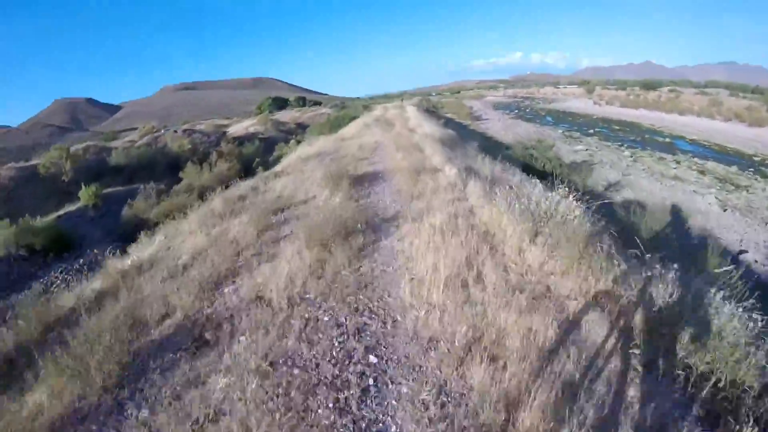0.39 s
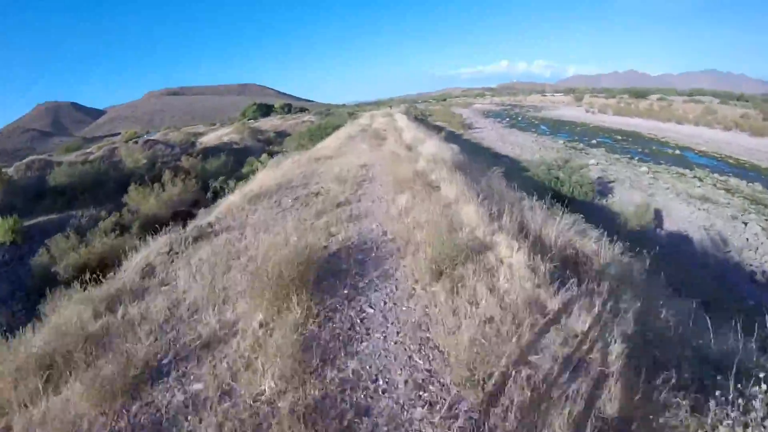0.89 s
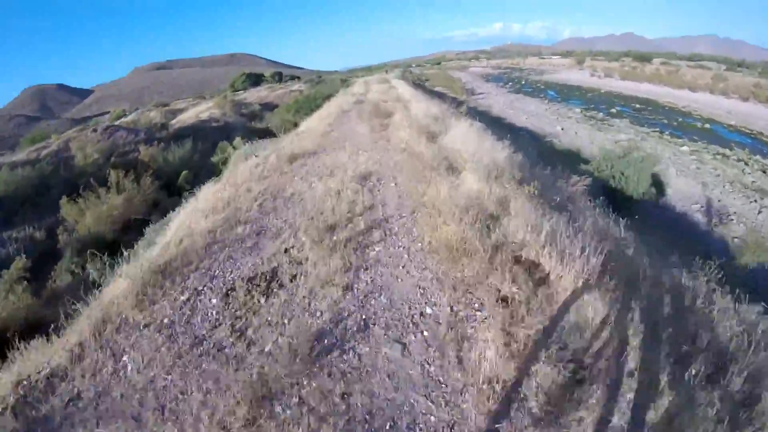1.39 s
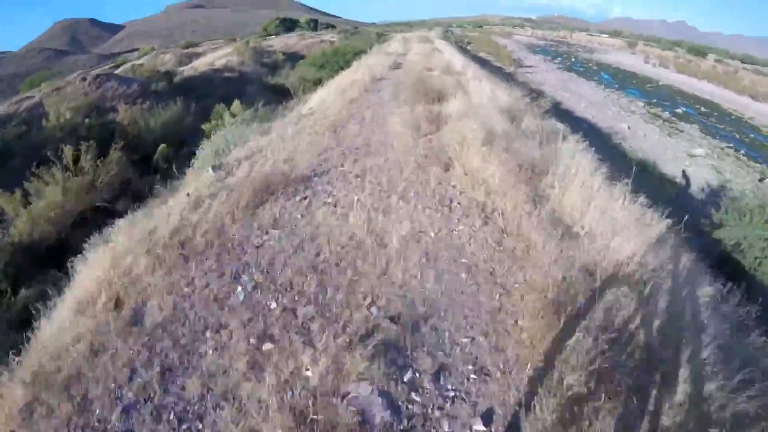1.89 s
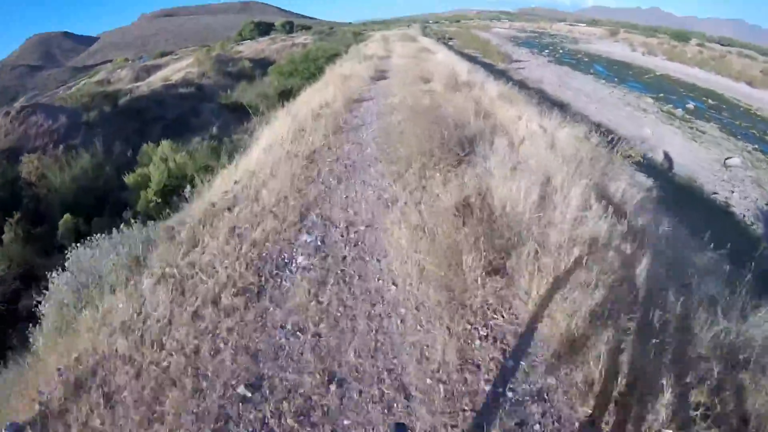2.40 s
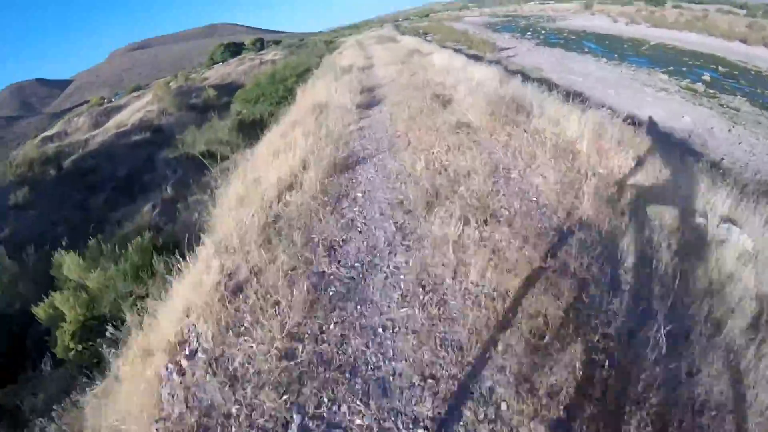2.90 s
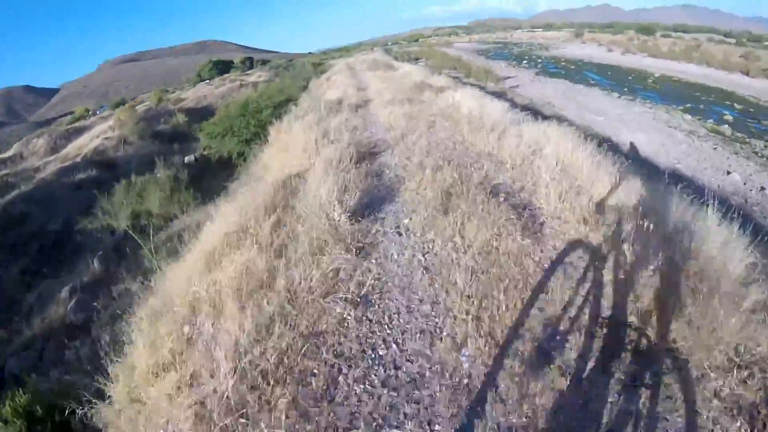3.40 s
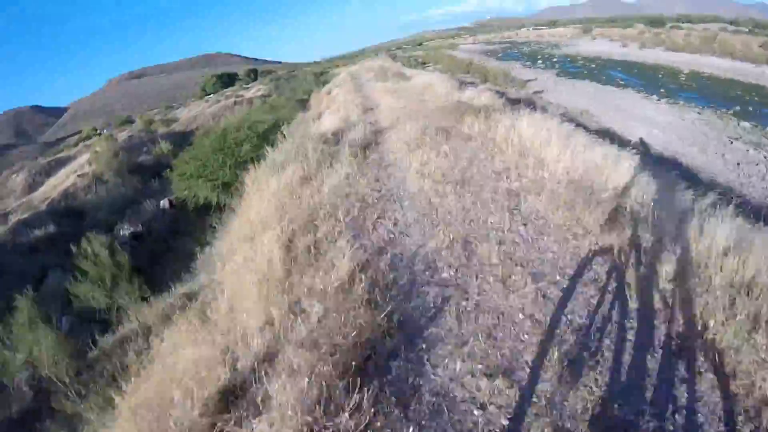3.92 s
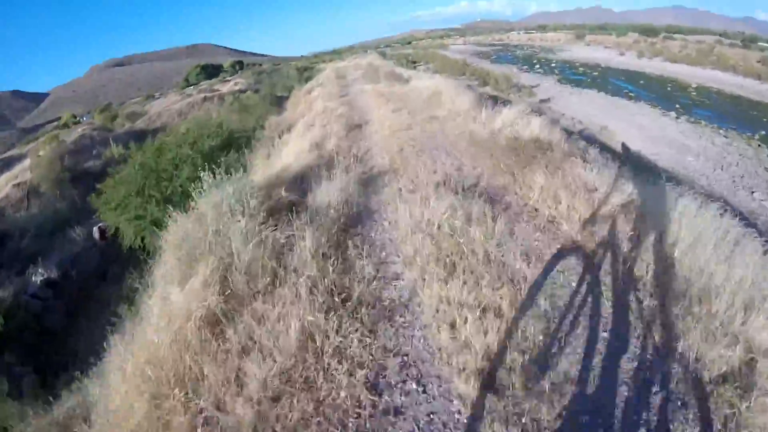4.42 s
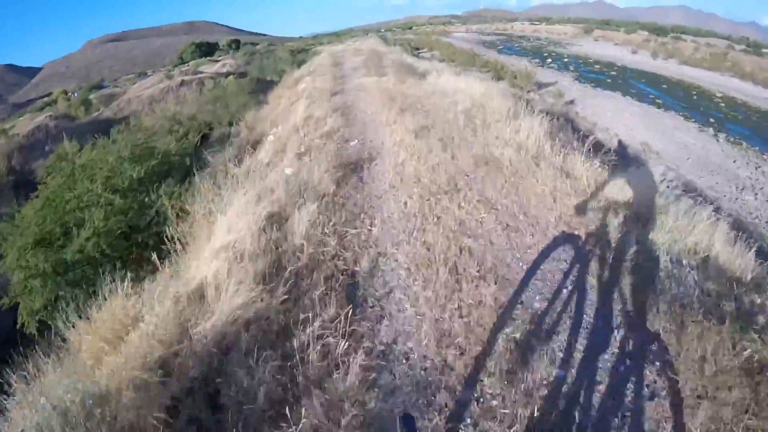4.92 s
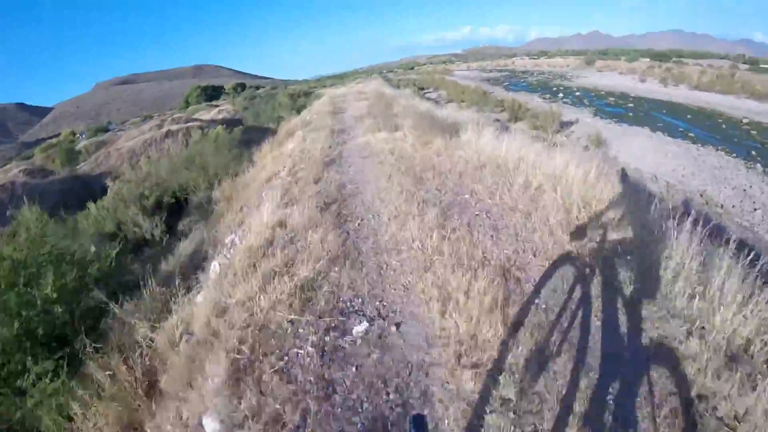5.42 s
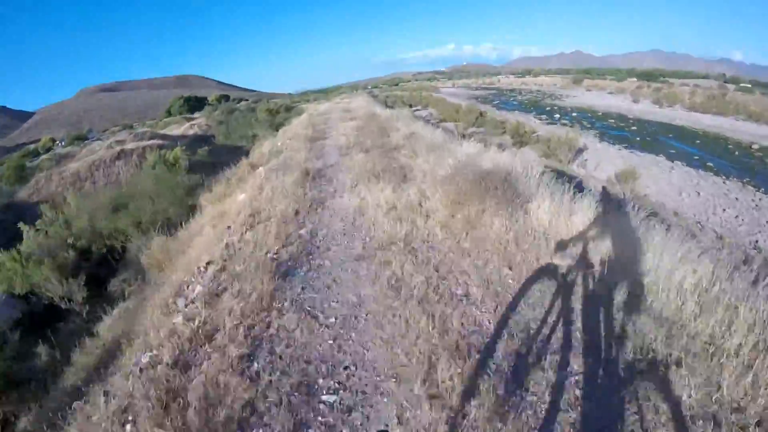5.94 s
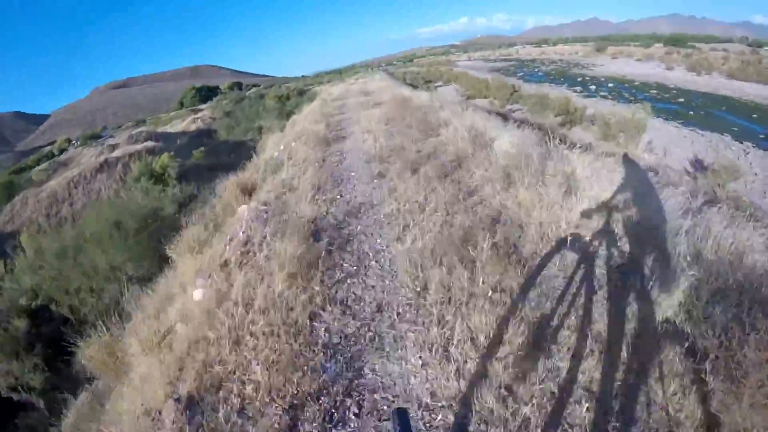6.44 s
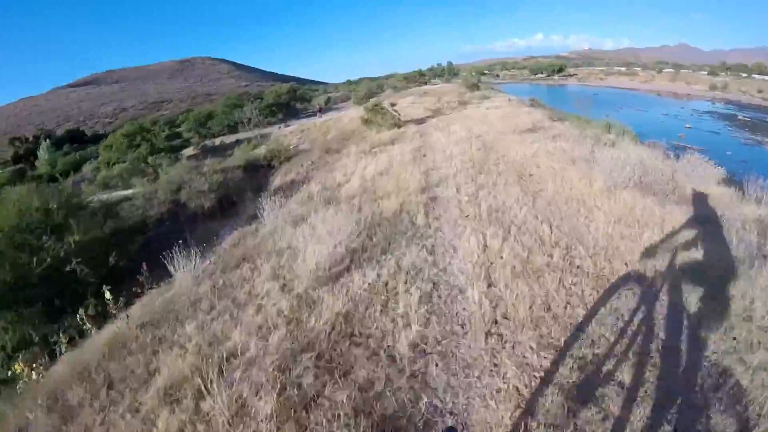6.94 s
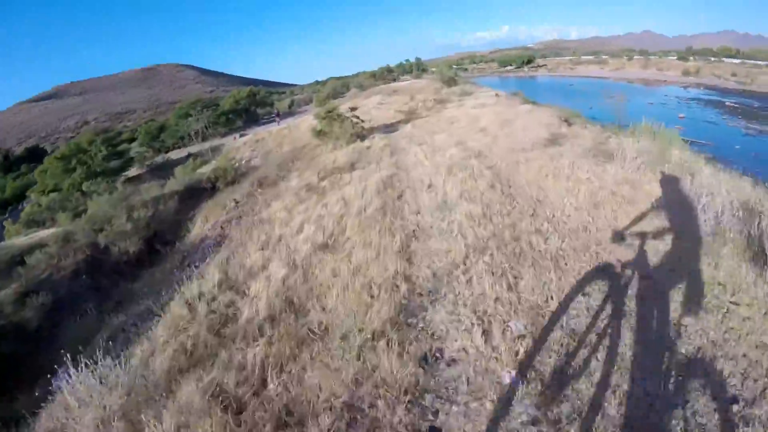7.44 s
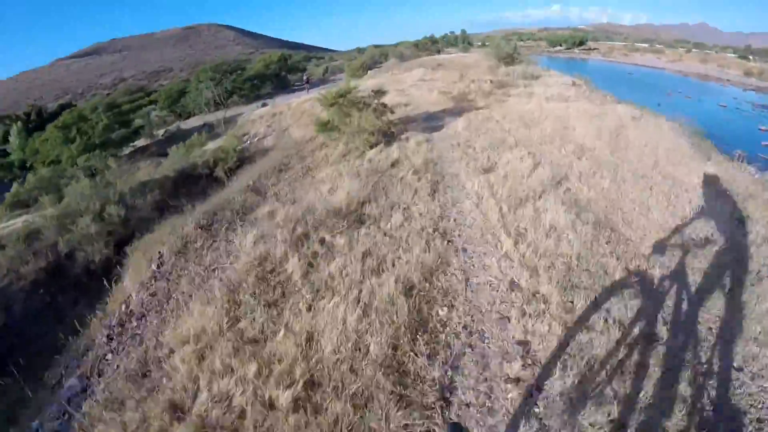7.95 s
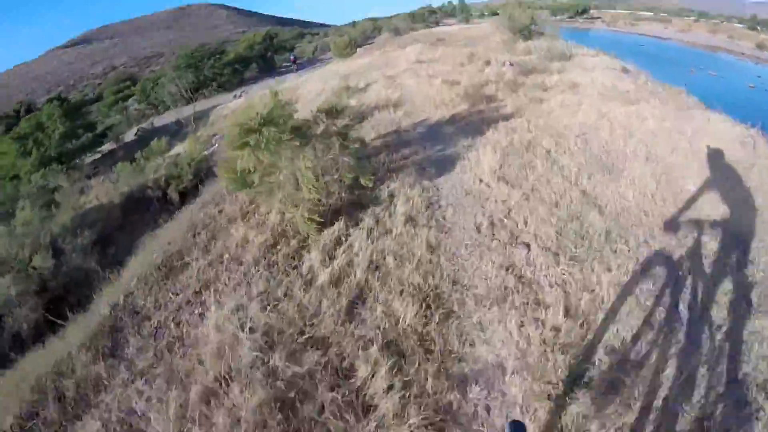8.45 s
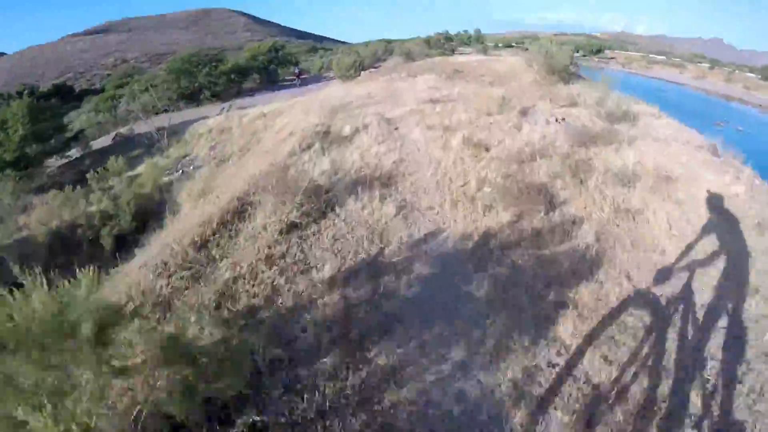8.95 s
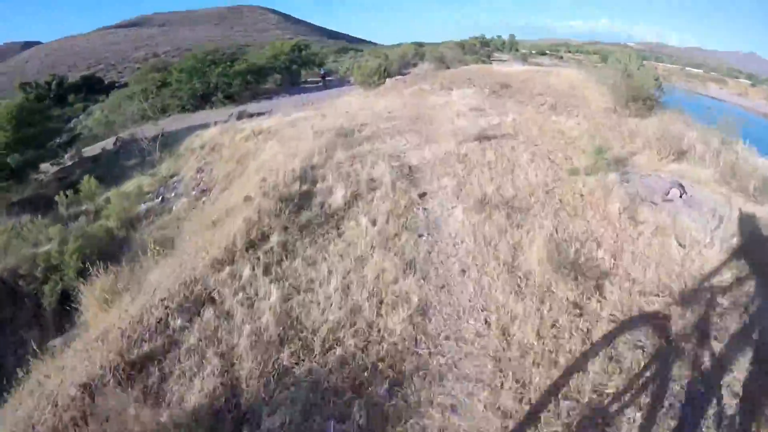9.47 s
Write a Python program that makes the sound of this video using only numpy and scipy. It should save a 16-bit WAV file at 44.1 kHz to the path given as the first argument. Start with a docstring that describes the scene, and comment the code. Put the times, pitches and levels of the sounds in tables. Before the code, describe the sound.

A mountain bike crunches along a gravel trail, with heavy lumpy wind rumble, snapping stones and a loose part knocking, heard from inside a closed housing.

```python
"""A low lumpy rumble of wind and frame shake comes first, with tyres crunching over gravel beneath it.
It is a mountain bike on a gravel trail, heard in a small closed housing; the rumble is coloured noise.
Chance stone slips puff up noise for the tyres, and decaying modes ring for a loose part knocking on its
mount. Noise bursts and clicks make stones and dry stalks snap, thump and scrape at the wheels; low swings
jolt the housing. One hard tick, a thin squeak and a faint electronic whine complete it."""
import sys
import numpy as np
from scipy import signal
from scipy.fft import rfft, irfft
from scipy.io import wavfile
from scipy.ndimage import uniform_filter1d, minimum_filter1d

SR = 44100
rng = np.random.default_rng(int(sys.argv[2]) if len(sys.argv) > 2 else 0)


def transcribe(u):
    """Save the signal u as a 16-bit wav file named by the first command-line argument.

    u: samples, shape (n,) or (channels, n), limited to [-1, 1]; the rate is SR.
    q: integer samples, one column per channel.
    """
    v = np.clip(np.atleast_2d(u).T, -1, 1)
    q = np.round(v * 32767).astype(np.int16)
    wavfile.write(sys.argv[1], SR, q)


def boost_factor(decibels):
    """Convert a level in decibels to a linear amplitude factor."""
    exponent = np.asarray(decibels, float) / 20
    return 10 ** exponent


N = 422919


def rms_one(x):
    """Scales a signal to an rms of 1."""
    return x / np.sqrt(np.mean(x ** 2) + 1e-20)


def in_time(rows):
    """Draws straight lines between the rows of a timed table, one curve per column."""
    s, *columns = np.transpose(rows)
    return [np.interp(np.arange(N) / SR, s, c) for c in columns]


def colour(x, spectrum):
    """Minimum-phase filter of a (Hz, dB) table, unit power for white noise: nothing sounds early."""
    size = 2 ** 14
    hz, db = np.transpose(spectrum)
    grid = np.maximum(np.arange(size // 2 + 1) * SR / size, 1)
    log_gain = np.interp(np.log(grid), np.log(hz), db) * np.log(10) / 20
    cepstrum = irfft(log_gain)
    # folding the cepstrum forward gives minimum phase
    cepstrum[1:size // 2] *= 2
    cepstrum[size // 2 + 1:] = 0
    response = irfft(np.exp(rfft(cepstrum)))
    return signal.fftconvolve(x, response / np.linalg.norm(response))[:N]


def band(x, low_hz, high_hz):
    """Keeps the range between two corners."""
    sos = signal.butter(2, [low_hz, high_hz], "band", fs=SR, output="sos")
    return signal.sosfilt(sos, x + 1e-18)


def levelled(x, level_db, low_hz, high_hz):
    """Sets the level of one range of x; the rest follows."""
    return boost_factor(level_db) * x / np.sqrt(np.mean(band(x, low_hz, high_hz) ** 2))


def drift(rate_hz):
    """Slow chance wander of rms 1: low-passed noise made at a twentieth of the sample rate."""
    r = np.exp(-40 * np.pi * rate_hz / SR)
    noise = rng.standard_normal(N // 20 + 4002)
    slow = signal.lfilter([1], [1, -2 * r, r * r], noise)[4000:]
    return np.interp(np.arange(N) / 20, np.arange(len(slow)), rms_one(slow))


def swells(rows, half_s):
    """Each (centre, dB) row swells and fades as a bell curve, summed in dB."""
    t = np.arange(0, N, 64) / SR
    s, db = np.transpose(rows)[:, :, None]
    bells = np.exp(-.5 * ((t - s) / half_s) ** 2)
    return np.interp(np.arange(N) / SR, t, np.sum(db * bells, axis=0))


def ring(clicks, hz, t60):
    """A unit click sets a sine of height 1 ringing."""
    r, w = boost_factor(-60 / (t60 * SR)), 2 * np.pi * hz / SR
    return signal.lfilter([0, np.sin(w)], [1, -2 * r * np.cos(w), r * r], clicks + 1e-18)


def resonance(x, hz, width_hz):
    """Resonant band of gain 1 on top."""
    r = np.exp(-np.pi * width_hz / SR)
    feedback = [1, -2 * r * np.cos(2 * np.pi * hz / SR), r ** 2]
    return signal.lfilter(np.array([1, 0, -1]) * (1 - r ** 2) / 2, feedback, x)


def clicks_at(times, db):
    """One-sample clicks at the given times and levels."""
    out = np.zeros(N)
    out[np.round(np.asarray(times) * SR).astype(int)] = boost_factor(db)
    return out


def bursts(times, db, t60):
    """Envelope that rises over about 3 ms at each time while it dies away."""
    out = np.zeros(N)
    for s, gain, decay in zip(times, boost_factor(db), np.clip(t60, .003, .2)):
        at, t = round(s * SR), np.arange(round(decay * SR)) / SR
        out[at:at + len(t)] += gain * boost_factor(-60 * t / decay) * np.minimum(t / 0.0031, 1)
    return out


def grit(per_s, spread_db, t60):
    """Envelope of chance stone slips: many small, a few large, each a short puff."""
    rise_s = 0.00027   # time constant of a slip's build-up
    sizes = boost_factor(spread_db * np.minimum(rng.exponential(1, N), 3.3))
    slips = sizes * (rng.random(N) < per_s / SR)
    slips = signal.lfilter([1], [1, -np.exp(-1 / (rise_s * SR))], slips)
    return rms_one(signal.lfilter([1], [1, -boost_factor(-60 / (t60 * SR))], slips))


def pebbles(per_s, low_hz, high_hz, cycles):
    """Small stones tick on the tyre wall in clumps and ring a few cycles, at pitches over an octave or so."""
    sizes = boost_factor(5.6 * np.minimum(rng.exponential(1, N), 3.2))
    hits = sizes * (rng.random(N) < per_s * boost_factor(4.0 * drift(8)) / SR)
    dealt = rng.integers(0, 12, N)   # each hit gets one of twelve pitches
    pitches = np.geomspace(low_hz, high_hz, num=12)
    rings = sum(ring(hits * (dealt == k), hz, cycles / hz) for k, hz in enumerate(pitches))
    return rms_one(band(rings, 0.72 * low_hz, 1.32 * high_hz))


# wind on the housing: start_s [s], strength_db [dB], sharpness_db [dB, flutter against the rumble]
WIND_STRENGTH = [(0.0, -17, 1), (0.21, -14.5, 2), (0.99, -13, 0.5), (1.04, -17, 1), (1.15, -15, 0),
                 (1.87, -20, 5), (2.03, -14, 0), (2.11, -13.5, -4.5), (2.32, -14.5, 1), (3.07, -22.5, 0.5),
                 (3.18, -18, -0.5), (4.06, -16.5, 1), (4.11, -20, 3), (4.48, -18.5, -3), (4.56, -15, 0.5),
                 (4.62, -20, -3.5), (5.77, -19, 2), (7.5, -16.5, 0), (7.77, -14, -0.5), (7.93, -21.5, 2.5),
                 (8.04, -13, -3), (8.49, -12, -3), (8.52, -6.5, -21), (8.55, -22.5, -1), (8.57, -24.5, 1),
                 (8.68, -11.5, -3.5), (8.71, -21, 0), (9.59, -18.5, -6.5)]


def wind():
    """Wind pressure rises and falls, and its flutter sharpens or dulls with it."""
    return in_time(WIND_STRENGTH)


# colour of wind and frame shake: pitch_hz [Hz], density_db [relative dB per Hz]
BUFFET_COLOUR = [(9, -25), (15, 4.5), (32, 0), (55, -1.5), (90, -4.5), (130, -7), (200, -10.5), (320, -19),
                 (500, -27), (700, -40.5), (1100, -120)]


def buffeting(wind_db, sharp_db):
    """Lumpy low pressure from wind and frame shake; the faster flutter surges on its own."""
    gusty_db = wind_db + 0.15 * drift(6.2)
    air = levelled(colour(rng.standard_normal(N), BUFFET_COLOUR), gusty_db, 15, 250)
    rumble = signal.sosfilt(signal.butter(1, 120, fs=SR, output="sos"), air)
    flutter = air - rumble
    return rumble + flutter * boost_factor(sharp_db + 2.37 * drift(3.4))


# the ground under the wheels: start_s [s], loose_gravel_db [dB], dry_grass_db [dB]
GROUND_LEVELS = [(0.0, -53, -61.5), (1.01, -54, -66), (2.0, -53.5, -62.5), (2.16, -53.5, -63.5),
                 (3.42, -52.5, -63), (4.0, -51.5, -62.5), (4.3, -54.5, -66), (4.86, -53.5, -64),
                 (6.06, -56, -68), (6.44, -53.5, -65.5), (7.18, -56.5, -63.5), (7.69, -52.5, -60),
                 (7.88, -54, -64), (8.01, -61.5, -70.5), (8.39, -53.5, -60), (8.63, -62.5, -67),
                 (8.86, -62, -69.5), (9.29, -56.5, -65.5), (9.59, -58, -62)]
# short stretches of loose stones: centre_s [s], lift_db [dB over the ground level]
LOOSE_STRETCHES = [(.32, 3), (.5, 0), (.74, 4), (1.06, 3.5), (1.17, 1), (1.38, 4), (1.47, 5), (1.56, -2),
                   (1.76, 6), (2.08, 1.5), (2.3, 5.5), (2.62, 1), (3.34, 2), (3.93, -0.5), (4.32, 2.5),
                   (4.48, 4.5), (4.63, 1.5), (4.86, 2), (5.26, 2.5), (5.64, 6.5), (6.13, -1), (6.38, 1),
                   (6.62, -1.5), (6.94, 2), (7.34, 2), (7.64, 4), (7.77, 4), (7.85, 1.5), (8.0, 11.5),
                   (8.3, 3), (8.58, 3.5), (9.05, 1.5), (9.16, 2), (9.34, 4.5), (9.43, 5.5)]
# tufts of dry grass brushing the wheel: centre_s [s], lift_db [dB over the grass level]
GRASS_TUFTS = [(.71, 1), (1.14, 1), (1.56, 13), (2.4, 6.5), (2.72, 7.5), (3.95, 6), (4.1, 4.5), (4.18, 9.5),
               (4.85, 0), (5.95, 4), (7.34, 7), (7.79, 3.5), (7.92, 4), (8.06, 6), (8.3, 1.5), (9.45, 1.5)]


def ground(wind_db):
    """Looser ground lifts gravel, grass and tyre roar; tufts lift grass alone, wind a share of the roar."""
    gravel_db, grass_db = in_time(GROUND_LEVELS)
    stones_db = swells(LOOSE_STRETCHES, half_s=0.022)
    gravel_db = gravel_db + stones_db
    grass_db = grass_db + stones_db + swells(GRASS_TUFTS, half_s=0.016)
    roar_db = -32 + 0.95 * (gravel_db - gravel_db.mean()) + 0.25 * (wind_db - wind_db.mean())
    return roar_db, gravel_db, grass_db


# tyre colours, each pitch_hz [Hz], density_db [relative dB per Hz]: the low roar,
ROAR_COLOUR = [(150, -20), (300, 0.5), (450, -2.5), (700, -3.5), (950, -3.5), (1150, -12.5), (1400, -14),
               (1700, -43), (2500, -51), (5000, -100)]
# the housing's two bright ranges, which meet near 4 kHz (snaps and scrapes use them too),
MIDDLE_COLOUR = [(700, -13.5), (1400, 7.5), (2000, -2.5), (2700, -4), (2950, -3.5), (3250, -1), (3600, -8),
                 (4050, -34.5), (6000, -57), (16000, -92)]
BRIGHT_COLOUR = [(2500, -33.5), (4050, -2.5), (5200, -1), (7100, -6), (8000, -12), (9000, -16),
                 (12000, -28.5), (16000, -60.5)]
# and the finest ticks
TOP_COLOUR = [(6000, -25), (8500, -9), (10500, -7.5), (12500, -15), (16000, -33.5)]


def tyres(roar_db, crunch_db, rustle_db):
    """Slipping stones puff up the noise, stalks add their own; roar, crunch and rustle share the bumps."""
    bumps, slips = drift(21.0), grit(200, spread_db=5.5, t60=0.03)
    fine = grit(310, spread_db=2.5, t60=0.0013)
    stalks = grit(120, spread_db=5.0, t60=0.016)
    white = rng.standard_normal((4, N))

    roar = colour(white[0] * (1.1 + 0.8 * slips), ROAR_COLOUR)
    roar = rms_one(roar * boost_factor(bumps + .5 * drift(29)))
    roar += boost_factor(-10.5) * pebbles(110, 548, 1276, cycles=28.0)

    crunch = colour(white[1] * (1.4 + 0.99 * slips + 0.47 * fine), MIDDLE_COLOUR)
    crunch = rms_one(crunch * boost_factor(1.6 * bumps))
    crunch += boost_factor(-10.0) * pebbles(200, 1500, 3430, cycles=32.0)

    rustle = colour(white[2] * (2.8 + .15 * slips + 0.12 * fine + 0.58 * stalks), BRIGHT_COLOUR)
    rustle = rms_one(rustle * boost_factor(1.2 * bumps + drift(8.4)))
    rustle += boost_factor(-4.5) * pebbles(150, 4500, 7600, cycles=60.0)

    specks = grit(25, spread_db=7.0, t60=.01)
    ticks = colour(white[3] * (0.35 + .15 * stalks + 0.2 * specks), TOP_COLOUR)

    out = levelled(roar, roar_db, 250, 750)
    out += levelled(crunch, crunch_db, 2200, 3300)
    out += levelled(rustle, rustle_db, 5000, 7500)
    return out + boost_factor(rustle_db - 14.0) * rms_one(ticks)


# loose part on its mount: swell_s [s], strength_db [dB], low_modes_db [dB against the main mode],
# crack_db [dB], crack_top_db [dB, its two top modes against the rest]
MOUNT_KNOCKS = [(0.7248, -19.5, -30, -38, -9), (2.2254, -9, -28, -32, -14), (2.453, -15, -28, -36, -10),
                (2.509, -18.5, -23, -39, 2), (2.7662, -4, -24, -25.5, -3), (2.7988, -16, -20, -41, -4),
                (3.038, -7.5, -23, -33, 4), (3.068, -18, -22, -60, 1), (4.0272, -15, -13, -38, 0),
                (4.1116, -3.5, -10, -25, -5), (4.175, -17.5, -7.5, -44, 3), (7.8908, -2, -10.5, -19, 0.5),
                (8.1733, -17, -25, -41, 0), (8.3247, -19.5, -28, -48, 0), (8.4847, -7.5, -11, -28, 3),
                (9.028, -25, -4.5, -48, 0)]
# modes of the mount, then of the crack: pitch_hz [Hz], level_db [relative dB], t60_s [s]
MOUNT_MODES = [(890, 4.5, 0.037), (1056, 14, 0.025), (1226, 4.5, 0.038), (1303, -11.5, 0.018)]
CRACK_MODES = [(1540, -11, 0.013), (1870, -14, 0.011), (2130, 0.5, 0.017), (2330, -12.5, 0.044),
               (2550, -20, 0.01), (2960, -18, 0.0075), (3380, -16.5, 0.0065), (5360, -11, 0.0044)]
# scattered clatter: pitch_hz [Hz], density_db [relative dB per Hz]
CLATTER_COLOUR = [(900, -12), (1500, -1.5), (2300, 0.5), (2900, -12.5), (3300, -13.5), (3700, -9),
                  (4200, -23.5), (6000, -32), (16000, -84.5)]


def knocks():
    """A soft contact swells the mount's close modes, which beat; a grating edge rings the upper ones."""
    s, strength_db, low_db, crack_db, top_db = np.transpose(MOUNT_KNOCKS)
    s = s - 0.001497   # contact comes this long before the swell is under way
    # the weaker the low modes, the stronger the short top one
    shift_db = [low_db, low_db, 0, -0.54 * low_db]
    body = sum(ring(clicks_at(s, strength_db + db + shift_db[k]), hz, t60) * (-1) ** k
               for k, (hz, db, t60) in enumerate(MOUNT_MODES))
    white = rng.standard_normal(N)

    def edge(db):
        """A few ms of grating and the first hard touch."""
        grating = white * bursts(s, db, np.full(len(s), .008))
        return grating + boost_factor(7.0) * clicks_at(s + 0.00113, db)

    low, top = edge(crack_db), edge(crack_db + top_db)
    crack = band(sum(boost_factor(db) * ring(low, hz, t60) for hz, db, t60 in CRACK_MODES[:-2]), 1300, 2900)
    crack += sum(boost_factor(db) * ring(top, hz, t60) for hz, db, t60 in CRACK_MODES[-2:])
    clatter = rng.standard_normal(N) * bursts(s, crack_db, np.full(len(s), .018))
    crack += boost_factor(9.0) * colour(clatter, CLATTER_COLOUR)
    return band(band(body, 500, 1400), 400, 2000) + band(crack, 1300, 6400)


# a wheel drops or strikes: start_s [s], push_db [dB before the band filter], swing_hz [Hz]
WHEEL_JOLTS = [(0.697, 0.5, 34.8), (0.96, 6, 27.2), (2.005, -3.5, 53), (3.24, 4, 32.3), (4.532, 4.5, 28.9),
               (5.795, 1.5, 26.8), (6.339, 4, 50), (7.189, 0, 26.6), (8.407, 3, 59.2), (8.504, -2, 39.3),
               (8.673, 2.5, 68.4), (8.8, 2, 26.9), (9.194, 0.5, 43.5)]


def jolts():
    """The housing takes one pressure swing per jolt: a push, a rebound and little more."""
    cycles = 2.75   # swings until it has died by 60 dB
    return sum(band(ring(clicks_at([at], push_db), swing_hz, cycles / swing_hz), 26, 390)
               for at, push_db, swing_hz in WHEEL_JOLTS)


# stones and stalks on the wheels: start_s [s], bright_db [relative dB], bright_pitch_hz [Hz],
# middle_db [relative dB], middle_pitch_hz [Hz]
WHEEL_SNAPS = [(0.111, -37, 4840, -43, 1820), (0.372, -53, 5000, -34, 2200), (0.451, -42, 5000, -39, 2200),
               (0.675, -40, 6700, -43, 2280), (0.769, -49, 5000, -37, 2610), (0.878, -50, 6460, -37, 2000),
               (1.053, -42, 5200, -46, 2020), (1.131, -40, 4630, -37, 3100), (1.172, -44, 7200, -45, 2100),
               (1.341, -48, 5000, -33, 2290), (1.409, -39, 4370, -47, 1850), (1.4224, -37, 4810, -46, 2100),
               (1.4826, -33, 4240, -32.5, 2550), (1.5519, -38, 4870, -39, 1950),
               (1.6468, -52, 5000, -36, 2300), (1.703, -50, 5000, -33, 2300), (1.759, -55, 5000, -42, 1800),
               (1.8284, -54, 5000, -36, 2000), (1.959, -48, 5000, -38, 1800),
               (1.9773, -49, 4330, -30, 2070), (2.128, -36.5, 7070, -46, 2200),
               (2.155, -49, 4540, -28, 2600), (2.371, -34, 6900, -40, 1700), (2.399, -37, 5510, -44, 1800),
               (2.4358, -31, 7200, -47, 2140), (2.563, -38, 4240, -29, 1790), (2.676, -36, 7200, -46, 1920),
               (2.8298, -36, 7100, -39, 1840), (3.1986, -38, 4960, -33.5, 1810),
               (3.2553, -53, 4440, -34, 1820), (3.3177, -38, 6860, -29, 2660),
               (3.4151, -34.5, 5210, -39, 2120), (3.495, -32.5, 6140, -42, 1810),
               (3.927, -35, 5340, -31.5, 2340), (3.9737, -42, 4680, -30, 2360),
               (4.122, -36, 5220, -31, 1800), (4.225, -42, 4790, -40, 3070), (4.2878, -55, 5000, -45, 2000),
               (4.37, -55, 5000, -39, 2800), (4.384, -52, 6160, -48, 2800), (4.4285, -42, 7200, -45, 3000),
               (4.4898, -56, 5000, -49, 2200), (4.639, -38, 6900, -45, 3460),
               (4.6669, -54, 5000, -48, 2000), (4.769, -42, 5100, -36, 2000), (4.809, -40, 6800, -41, 2120),
               (4.983, -55, 5000, -36, 2400), (5.2477, -41, 5100, -51, 1900),
               (5.3079, -57, 5000, -41, 2200), (5.4062, -53, 5000, -37, 2200),
               (5.508, -43, 4680, -36, 1980), (5.595, -58, 5000, -44, 2800), (5.65, -53, 4430, -33, 2580),
               (5.682, -49, 5000, -38, 2800), (5.745, -57, 5000, -36, 3000),
               (5.855, -45.5, 6060, -56, 2330), (6.037, -44, 4550, -54, 1800),
               (6.055, -42, 6210, -44, 3140), (6.136, -53, 5000, -36, 2200), (6.361, -51, 7000, -36, 2200),
               (6.4668, -47, 5000, -41, 2200), (6.5292, -57, 5000, -41, 2200),
               (6.626, -43, 6840, -32, 2260), (6.642, -35, 5870, -39, 1800), (6.809, -36, 4310, -51, 1830),
               (6.9517, -52, 5000, -52, 2200), (7.006, -37, 7040, -48, 3320), (7.037, -43, 7240, -46, 3000),
               (7.234, -33.5, 4580, -36, 2300), (7.3264, -27.5, 7120, -32, 1790),
               (7.338, -33, 6280, -43, 1800), (7.343, -32, 7100, -40, 3350), (7.382, -59, 5000, -39, 2000),
               (7.4495, -46, 4830, -41, 3110), (7.501, -38, 4860, -50, 1800),
               (7.519, -37, 4570, -33.5, 2680), (7.575, -29, 5620, -39, 1800),
               (7.679, -29, 5500, -27, 3050), (7.98, -36, 4860, -52, 1950), (7.988, -50, 4400, -36, 3140),
               (8.095, -38.5, 4680, -53.5, 2600), (8.1635, -42, 4180, -37, 2300),
               (8.1805, -26, 5250, -43, 3060), (8.255, -41, 5500, -52, 3000), (8.295, -46, 4390, -30, 3380),
               (8.328, -47, 6000, -42, 2400), (8.3516, -40, 4620, -37, 1870), (8.374, -47, 6000, -35, 2700),
               (8.421, -37, 5800, -62, 2030), (8.438, -44, 6000, -55, 2500), (8.4637, -39, 6000, -35, 2200),
               (8.496, -35.5, 5200, -31, 1980), (8.577, -57, 5000, -40, 2200), (8.74, -39, 5730, -51, 2130),
               (8.802, -51, 4600, -41, 2500), (9.2222, -28, 7100, -43, 3340),
               (9.2495, -51, 5000, -42, 2600), (9.48, -41, 4600, -36, 3300)]


def snaps():
    """A burst of noise, part spread over the housing's ranges, part ringing at pitches of its own."""
    s, bright_db, _, middle_db, _ = np.transpose(WHEEL_SNAPS)
    t60 = 0.019 * np.exp(0.33 * rng.standard_normal(len(s)))   # median 19 ms
    white = rng.standard_normal(N)
    bright, middle = white * bursts(s, bright_db, t60), white * bursts(s, middle_db, t60)
    # the break itself is one hard click
    middle += boost_factor(14.5) * clicks_at(s + 0.0006, middle_db)
    bright += boost_factor(10.5) * clicks_at(s + 0.0007, bright_db)
    snap_colour = [(2500, -44.0), (4300, -2.5), (7200, 3.0), (8500, -22), (12000, -22.0), (16000, -41.5)]
    out = boost_factor(-5.0) * colour(bright, snap_colour) + boost_factor(2.5) * colour(middle, MIDDLE_COLOUR)
    next_s = np.append(s[1:], 1e3)
    for (at, _, bright_hz, _, middle_hz), following in zip(WHEEL_SNAPS, next_s):
        # each pitch rings for 50 ms or until the next snap
        span = slice(round(at * SR), min(round((at + .05) * SR), round(following * SR)))
        out[span] += boost_factor(6.5) * resonance(resonance(bright[span], bright_hz, 1000), bright_hz, 1000)
        out[span] += boost_factor(16.0) * resonance(resonance(middle[span], middle_hz, 510), middle_hz, 510)
    return out


# stones thumping the tyre wall: start_s [s], level_db [dB], pitch_hz [Hz], t60_s [s]
TYRE_THUMPS = [(0.507, -18, 940, 0.015), (0.541, -26, 975, 0.02), (0.604, -18, 740, 0.039),
               (0.676, -9.5, 860, 0.019), (0.987, -21, 1200, 0.018), (1.053, -17, 836, 0.022),
               (1.075, -12, 700, 0.014), (1.758, -32, 950, 0.015), (1.83, -20, 810, 0.016),
               (1.978, -16, 965, 0.0089), (2.082, -19.5, 960, 0.021), (2.359, -17.5, 936, 0.027),
               (2.562, -11, 904, 0.032), (3.2606, -11.5, 840, 0.013), (3.652, -8.5, 836, 0.021),
               (3.686, -20, 920, 0.02), (4.204, -14, 850, 0.017), (4.316, -17, 865, 0.021),
               (4.497, -15.5, 890, 0.017), (4.666, -19, 875, 0.015), (4.632, -20, 950, 0.02),
               (4.767, -19.5, 950, 0.021), (4.814, -16.5, 830, 0.038), (5.782, -19, 885, 0.01),
               (6.952, -15.5, 786, 0.0036), (7.322, -16, 822, 0.072), (7.346, -12, 845, 0.017),
               (7.38, -12, 740, 0.012), (7.58, -15, 915, 0.021)]
# colour of the tick: pitch_hz [Hz], density_db [relative dB per Hz]
TICK_COLOUR = [(300, -21.5), (700, 0), (1000, 4.5), (1450, -3.5), (1800, -16.5), (3200, -38), (4000, -36.5),
               (16000, -83.5)]


def thumps():
    """A hard tick through the whole tyre colour, a short hollow ring and a puff of noise."""
    s, level_db, _, t60 = np.transpose(TYRE_THUMPS)
    puff = boost_factor(-5.5) * rng.standard_normal(N) * bursts(s, level_db, t60)
    out = colour(puff + boost_factor(11.5) * clicks_at(s, level_db), TICK_COLOUR)
    for at, db, hz, decay in TYRE_THUMPS:
        t = np.arange(round(decay * SR)) / SR
        ringing = boost_factor(db - 60 * t / decay) * np.sin(2 * np.pi * hz * t) * np.minimum(t / 0.00073, 1)
        out[round(at * SR):round(at * SR) + len(t)] += ringing
    return out


# the tyre scrapes through heaps of small stones: start_s [s], length_s [s],
# middle_db [relative dB], bright_db [relative dB]
STONE_SCRAPES = [(0.702, 0.0098, -54, -50), (1.141, 0.047, -43.5, -57), (2.248, 0.036, -40, -82),
                 (3.774, 0.011, -39, -53), (3.805, .015, -44, -60), (3.909, 0.032, -34, -52),
                 (3.968, 0.015, -34, -51), (4.022, 0.018, -44, -48), (4.074, 0.036, -36, -60),
                 (4.112, 0.02, -37, -47), (4.227, 0.016, -47, -59), (4.81, 0.028, -43, -50),
                 (4.867, 0.014, -35, -50), (4.907, 0.016, -39, -54), (6.654, 0.011, -57, -56),
                 (7.32, 0.03, -37, -50), (7.444, 0.02, -50, -58), (7.664, 0.018, -35, -48),
                 (7.986, 0.012, -32.5, -47), (8.166, 0.034, -38, -55), (8.275, 0.017, -40, -55),
                 (8.482, 0.016, -32, -42)]


def scrapes():
    """A held rush of dense stone slips, in the housing's middle and bright ranges."""
    edge_s = 0.0026   # rise and fall
    t = np.arange(N) / SR
    slips = 0.38 + 0.32 * grit(400, spread_db=1.0, t60=.004)
    white, gains = rng.standard_normal((2, N)) * slips, np.zeros((2, N))
    for s, length, middle_db, bright_db in STONE_SCRAPES:
        end = s + length + edge_s
        span = slice(round(s * SR), round(end * SR))
        hold = np.clip(np.minimum(t[span] - s, end - t[span]) / edge_s, 0, 1)
        gains[:, span] += boost_factor(np.array([[middle_db], [bright_db]])) * hold
    return colour(white[0] * gains[0], MIDDLE_COLOUR) + colour(white[1] * gains[1], BRIGHT_COLOUR)


# a hard stone flicks the frame: start_s [s], then the drive [dB] of four mode groups:
# low_db, middle_db, high_db, finest_db
STONE_FLICKS = [(.128, -43, -35, -55, -65), (.311, -40, -38, -52, -65), (.515, -47, -48, -42, -64),
                (1.18, -28, -45, -53, -65), (1.3465, -50, -46, -42, -62), (1.424, -50, -50, -48, -49),
                (1.979, -14, -29, -55, -66), (1.993, -45, -38, -42, -52), (2.143, -50, -45, -42, -65),
                (2.371, -20, -40, -48, -60), (3.12, -50, -48, -42, -58), (3.1745, -44, -38, -50, -62),
                (3.191, -48, -38, -44, -62), (3.282, -55, -49, -45, -56), (3.408, -52, -32, -47, -60),
                (3.4955, -29, -36, -48, -50), (3.627, -42, -35, -52, -65), (4.43, -50, -50, -50, -52),
                (5.682, -45, -33, -52, -64), (6.206, -45, -38, -56, -65), (6.314, -45, -31.5, -59, -67),
                (6.363, -45, -47, -52, -50), (6.372, -27, -45, -54, -65), (6.423, -48, -48, -46, -64),
                (7.031, -45, -39, -45, -62), (7.038, -48, -48, -46, -44), (7.652, -26, -45, -52, -65),
                (7.6763, -40, -21, -17, -33), (7.696, -42, -32, -50, -65), (8.108, -55, -50, -47, -53),
                (8.168, -50, -48, -45, -51), (8.2693, -12, -10.5, -22.5, -67), (8.552, -52, -42, -40, -64),
                (8.998, -55, -46, -46, -63), (9.383, -27, -48, -55, -68)]
# modes of the housing: pitch_hz [Hz], level_db [relative dB], t60_s [s]
HOUSING_MODES = [(1280, -0.5, .008), (1750, 0, 0.0068), (2120, -2.5, 0.0067), (3210, -2.5, .013),
                 (4830, -6.5, 0.0052), (5650, -4, 0.0049), (7100, 3.5, 0.0053), (10100, 0.5, .004),
                 (13500, -5.5, .003)]


def flicks():
    """One clean click rings every mode of the housing; the wall dulls all but the finest."""
    s, *group_db = np.transpose(STONE_FLICKS)
    groups = [0, 0, 0, 1, 2, 2, 2, 3, 3]   # the group of each mode
    rings = [ring(clicks_at(s, group_db[g] + db), hz, t60) * (-1) ** k
             for k, (g, (hz, db, t60)) in enumerate(zip(groups, HOUSING_MODES))]
    dulled = band(band(sum(rings[:-2]), 700, 8200), 500, 8200)
    return dulled + band(sum(rings[-2:]), 8500, 16000)


def jump():
    """The waveform jumps down once, approached and left smoothly: a hard full-range tick."""
    jump_s, step_db, return_s = 6.8195, -8.5, .004
    t = np.arange(N) / SR - jump_s
    return -.5 * boost_factor(step_db) * np.sign(t) * np.exp(-np.abs(t) / return_s)


def squeak():
    """One faint thin squeak: noise through a narrow resonance, swelling and fading."""
    centre_s, half_s, pitch_hz, level_db = 8.875, .03, 2160, -64
    tone = rms_one(resonance(resonance(rng.standard_normal(N), pitch_hz, 40), pitch_hz, 40))
    return boost_factor(level_db) * tone * np.exp(-.5 * ((np.arange(N) / SR - centre_s) / half_s) ** 2)


def whine():
    """A faint steady electronic sine whose level wanders."""
    pitch_hz = 9651
    return boost_factor(-88 + 3.0 * drift(4.0)) * np.sin(2 * np.pi * pitch_hz * np.arange(N) / SR)


def scene():
    """Wind and ground set the levels of the rumble and tyres; every other source is laid on top."""
    wind_db, sharp_db = wind()
    mix = buffeting(wind_db, sharp_db) + tyres(*ground(wind_db))
    mix += knocks() + jolts() + snaps() + thumps() + scrapes() + flicks()
    mix += jump() + squeak() + whine()
    return mix[None]


def top_cut(x):
    """Nothing passes above the cut-off."""
    return signal.sosfilt(signal.butter(12, 16520, fs=SR, output="sos"), x)


def record(dry):
    """Gain control ducks after loud peaks and creeps back; a limiter looks ahead and holds full scale."""
    threshold_db, share, attack_s, release_db_per_s = -2.5, 0.9, 0.015, 39.5
    climb = release_db_per_s * np.arange(N) / SR
    excess_db = share * np.maximum(20 * np.log10(np.abs(dry) + 1e-9) - threshold_db, 0)
    held_db = np.maximum.accumulate(excess_db + climb, axis=1) - climb
    r = np.exp(-1 / (attack_s * SR))
    ducked = dry * boost_factor(-signal.lfilter([1 - r], [1, -r], held_db))
    reach = round(.001 * SR)   # 1 ms look-ahead
    allowed = minimum_filter1d(1 / np.maximum(np.abs(ducked), 1), size=2 * reach + 1, axis=1)
    finished = ducked * uniform_filter1d(allowed, size=reach, axis=1)
    return top_cut(finished)


dry = scene()
out = record(dry)
transcribe(out)
```